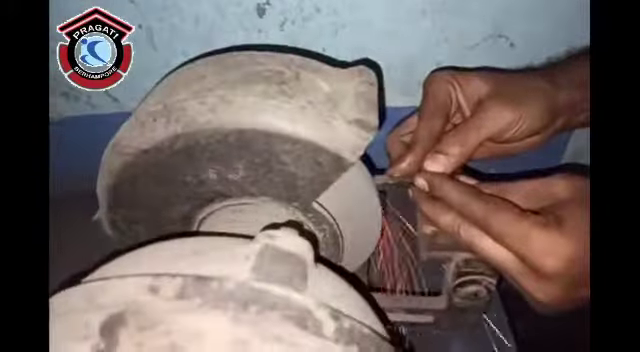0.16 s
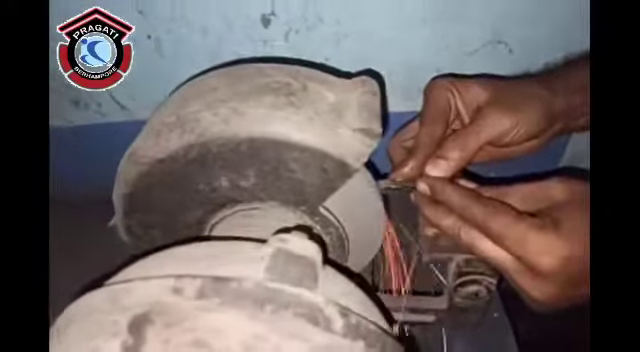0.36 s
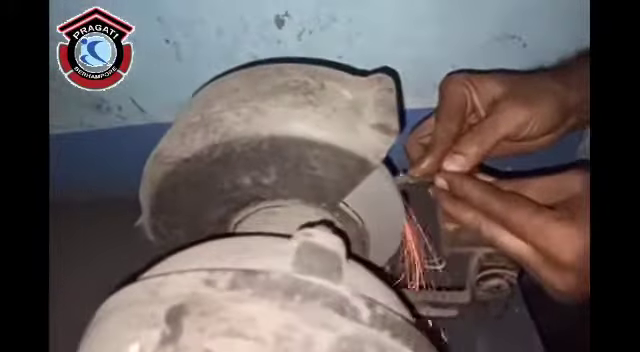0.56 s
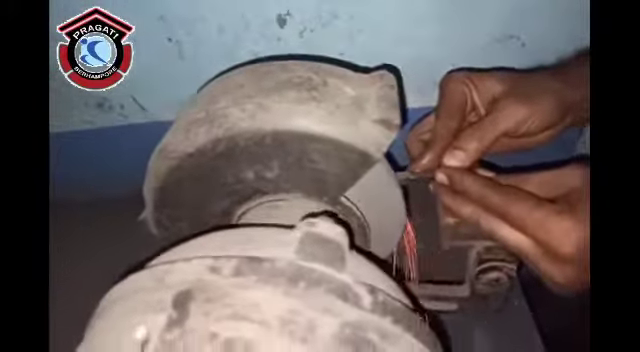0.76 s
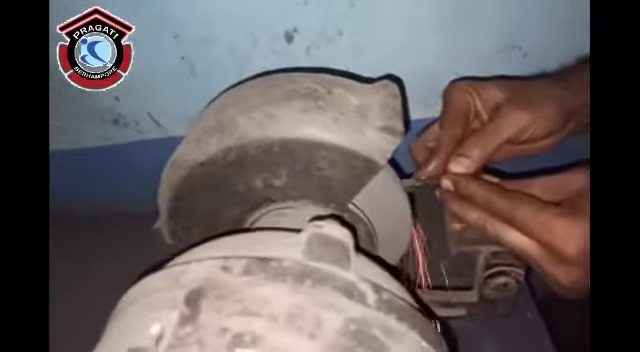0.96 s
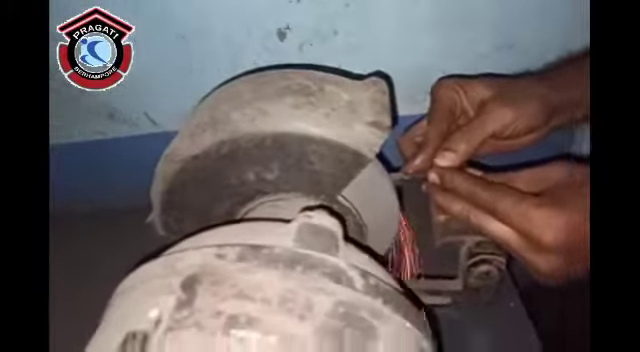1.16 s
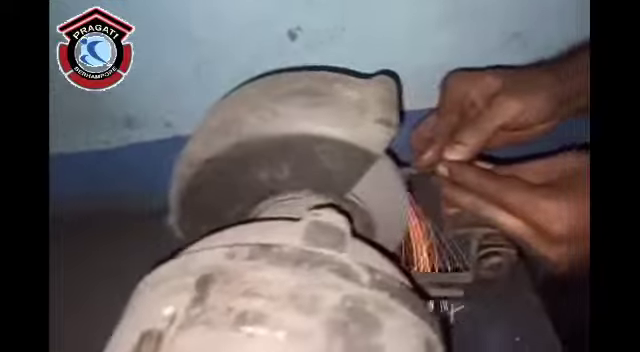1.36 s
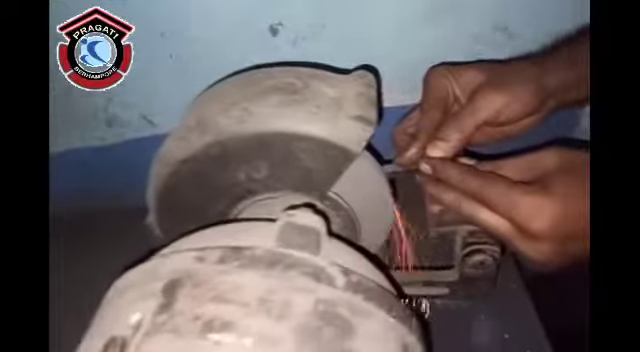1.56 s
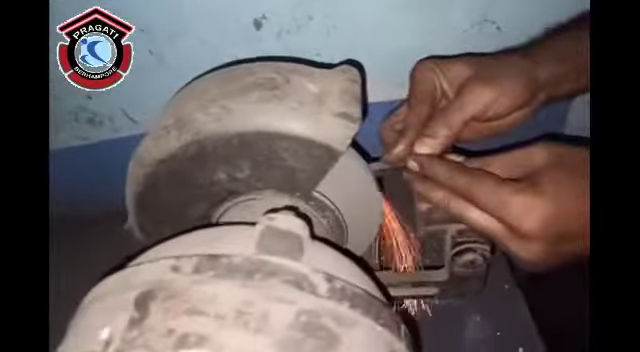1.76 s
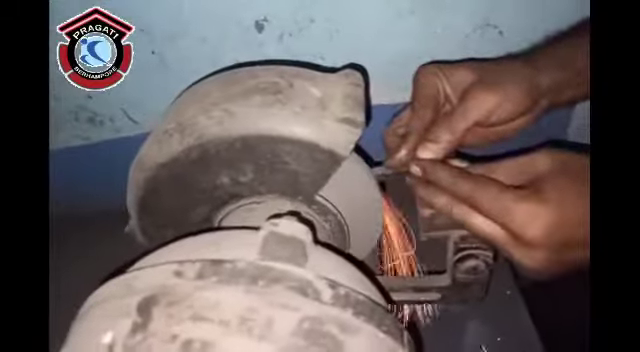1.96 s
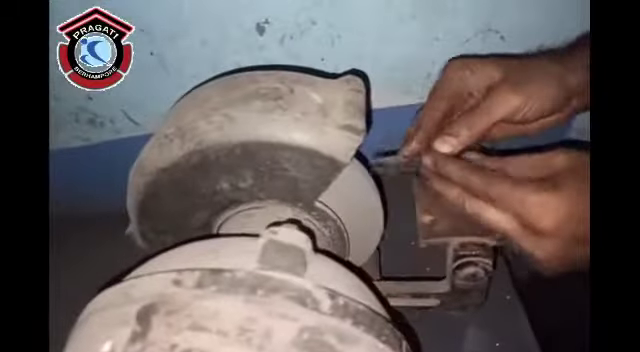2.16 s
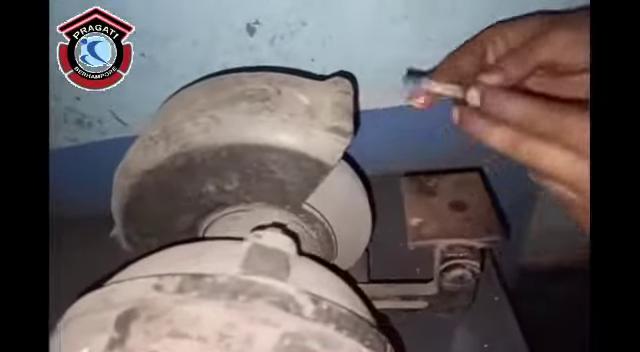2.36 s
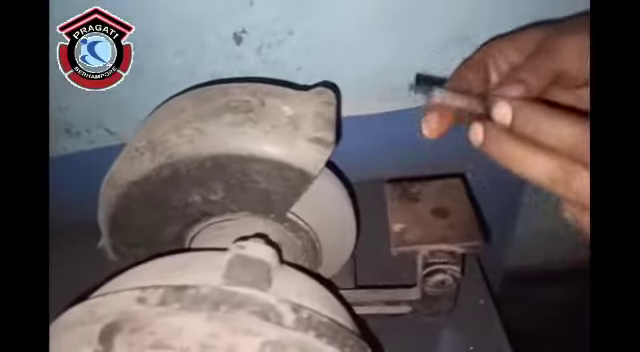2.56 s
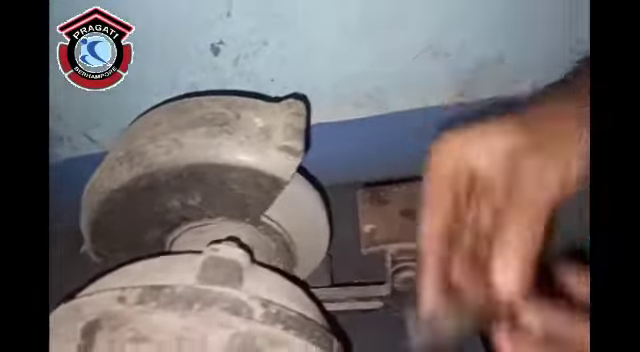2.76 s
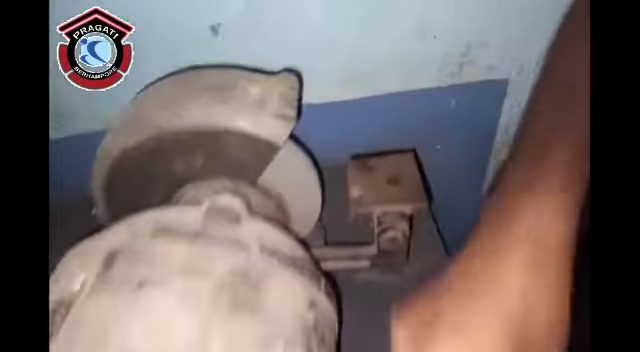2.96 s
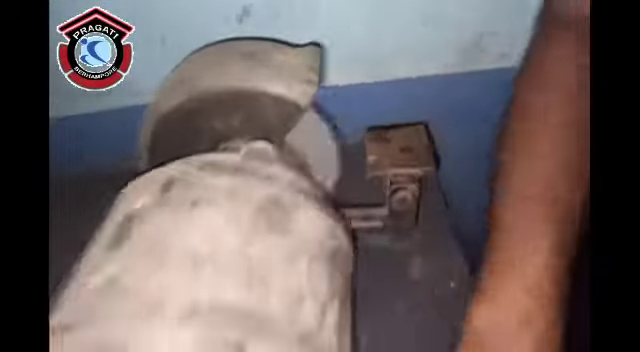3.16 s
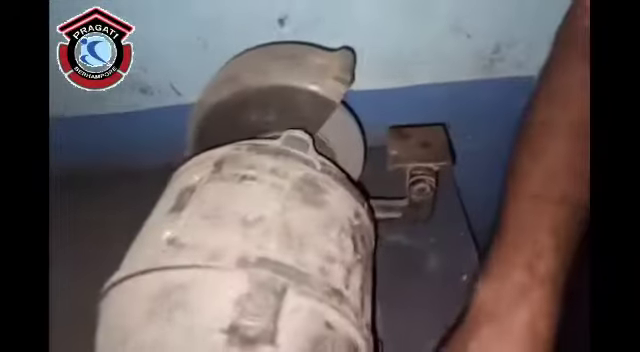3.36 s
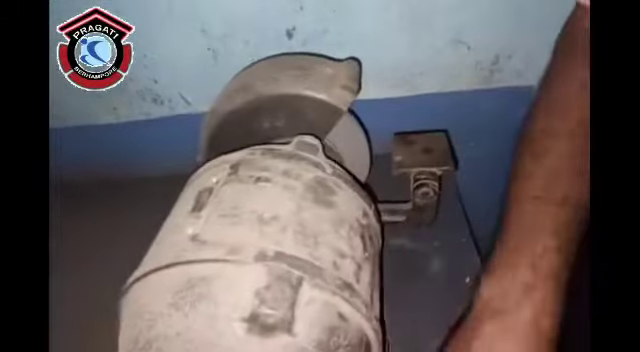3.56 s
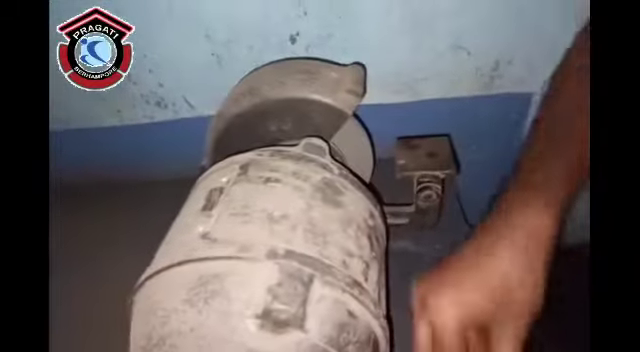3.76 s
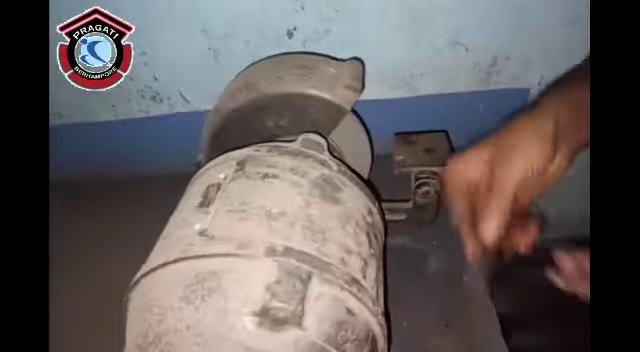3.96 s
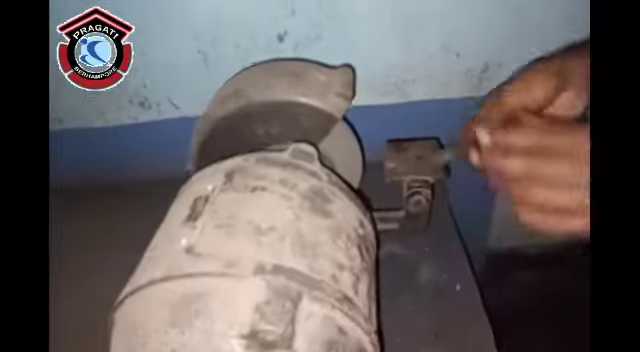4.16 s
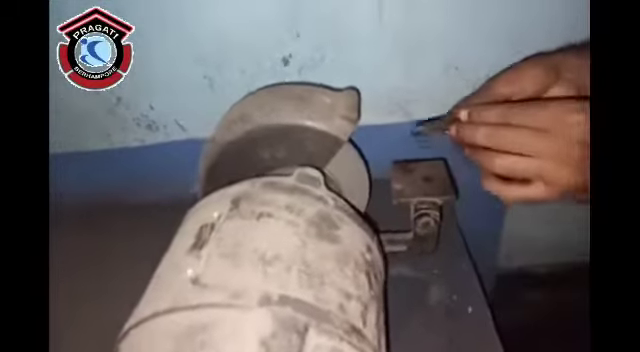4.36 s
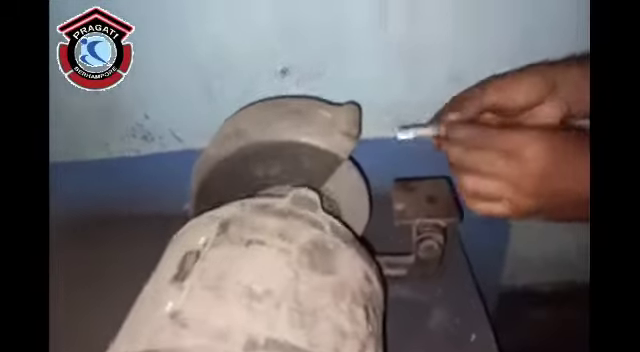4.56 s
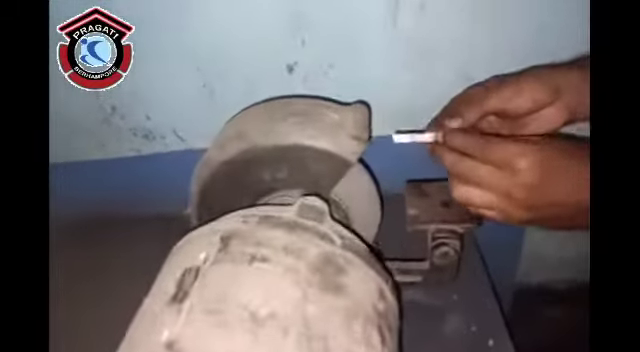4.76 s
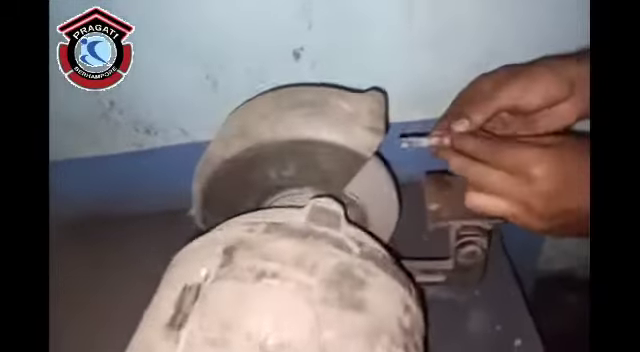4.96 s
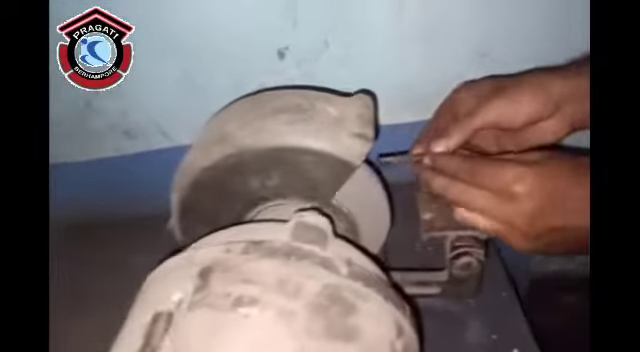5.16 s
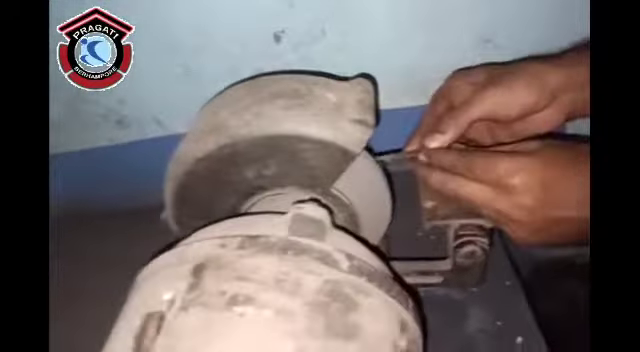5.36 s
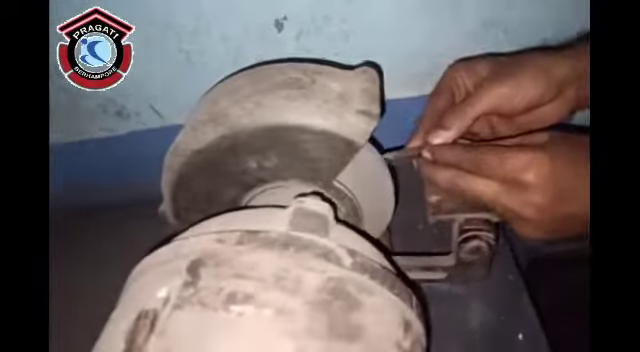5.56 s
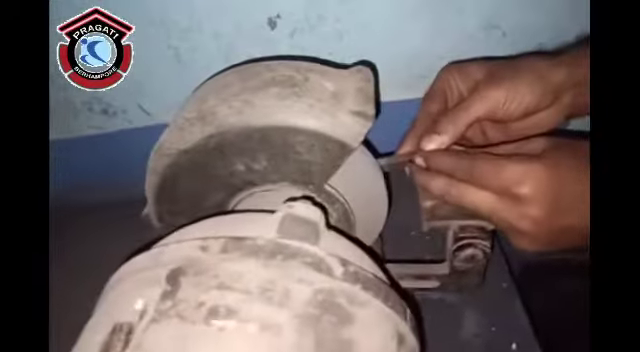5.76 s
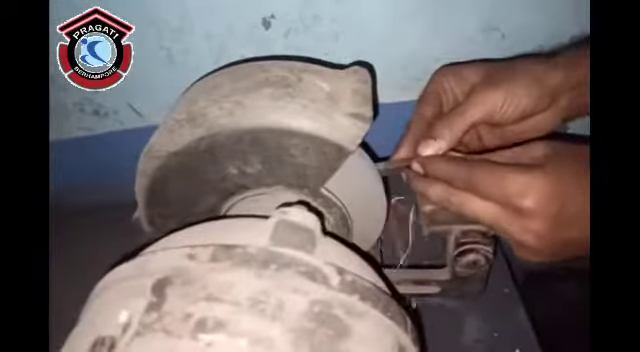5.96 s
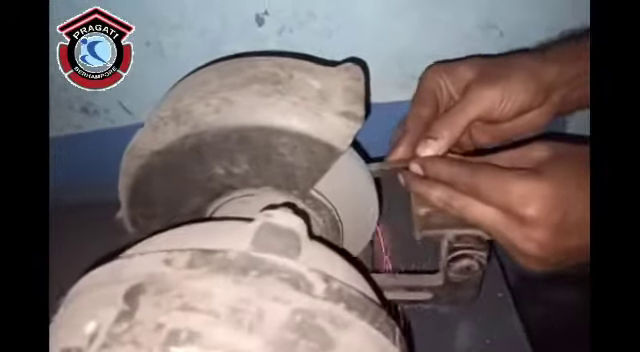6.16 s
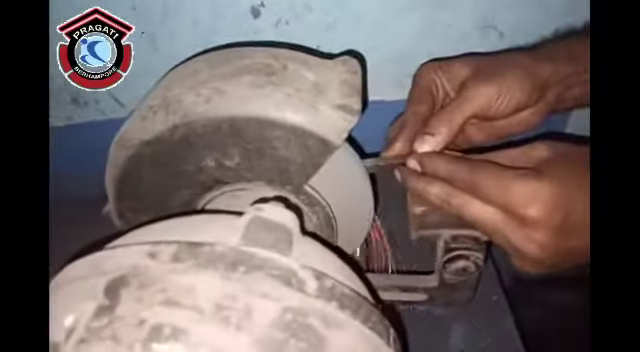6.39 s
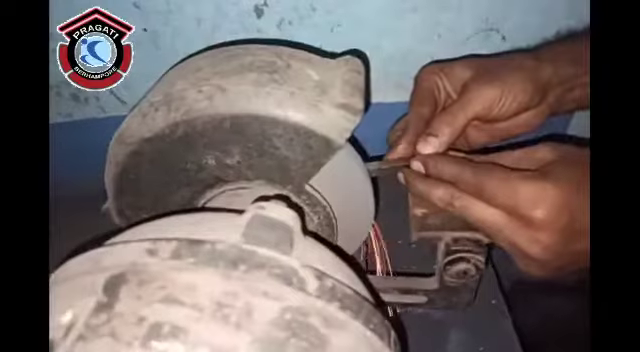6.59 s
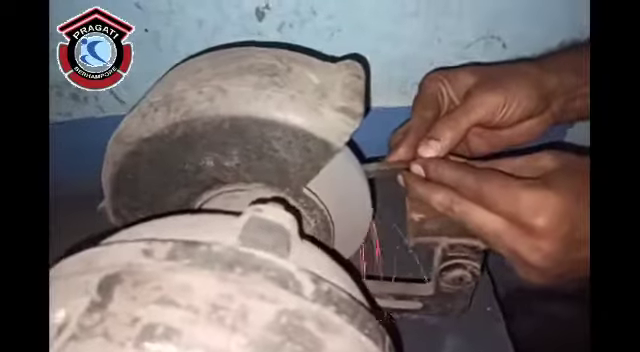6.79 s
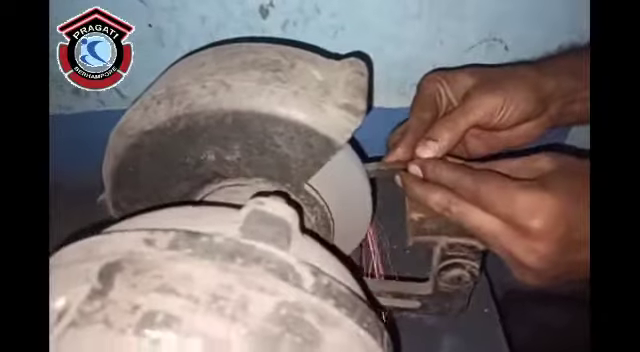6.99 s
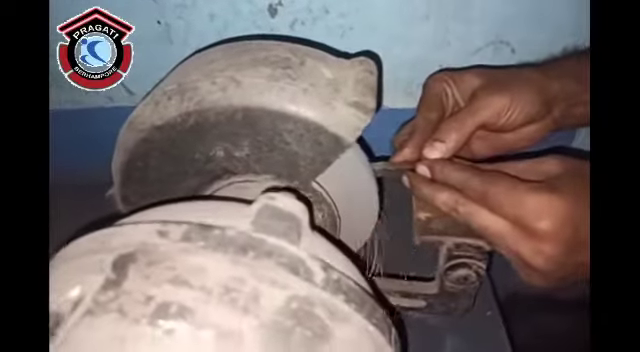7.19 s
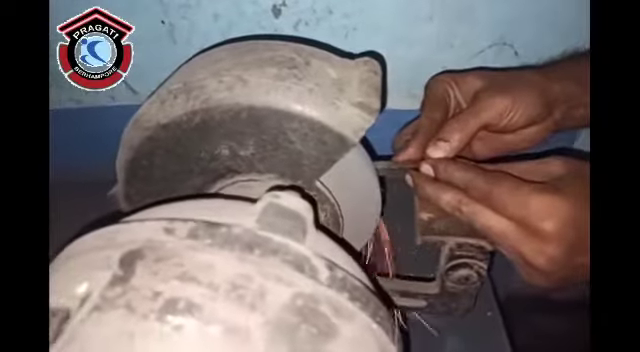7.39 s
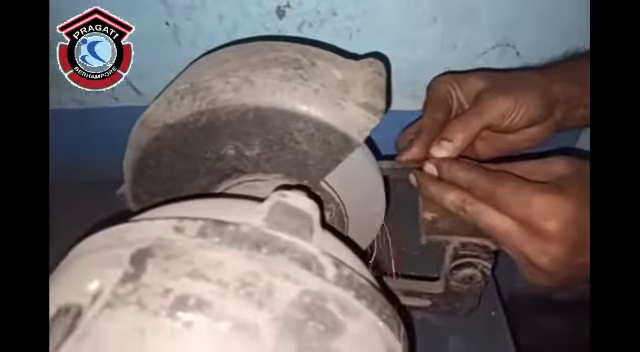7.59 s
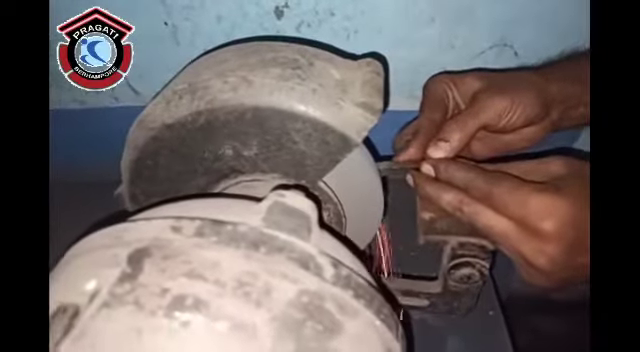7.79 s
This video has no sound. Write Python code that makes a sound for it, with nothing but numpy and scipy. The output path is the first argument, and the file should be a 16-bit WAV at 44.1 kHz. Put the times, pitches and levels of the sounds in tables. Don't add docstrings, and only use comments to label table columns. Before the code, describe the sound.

Bright, ringing metal grinding stops after two seconds, leaving motor hum with loose guard knocks and buzz, before a second grinding pass begins and continues.

```python
import sys
import numpy as np
from scipy import signal
from scipy.fft import rfft, irfft, dct, next_fast_len
from scipy.io import wavfile
from scipy.ndimage import uniform_filter1d, map_coordinates

SR = 44100
rng = np.random.default_rng(int(sys.argv[2]) if len(sys.argv) > 2 else 0)


def linear_from_db(decibels):
    return 10 ** (np.asarray(decibels, float) / 20)


def materialize(psi):
    bounded = np.clip(np.atleast_2d(psi).T, -1, 1)
    quanta = np.round(bounded * 32767).astype(np.int16)
    wavfile.write(sys.argv[1], SR, quanta)


N = 345303
SIZE = next_fast_len(N + SR // 4)
HZ = np.maximum(np.arange(SIZE // 2 + 1) * SR / SIZE, 1)
GAP_HZ, CUTOFF_HZ = (8530, 11480), 15900
# start_s, peak_db, low_panels_db (above the peak)
KNOCKS = [(2.2618, -27, -2), (2.2804, -19, 2), (2.4385, -17.5, 5.5), (2.5177, -27, -11), (2.5805, -23, 4),
          (2.6224, -23, 3), (2.6858, -26.5, 10), (2.7327, -23, 5), (2.7836, -24, 8), (2.8384, -29, 12.5),
          (2.9013, -26, 2), (3.0315, -26.5, 7), (3.0565, -30, 1), (3.2051, -26, 12), (3.2897, -22, 5),
          (3.4171, -23, 3), (3.5428, -24, 0), (3.6486, -30, 9), (3.8834, -28, 6), (4.1424, -32, 13),
          (4.2882, -31.5, 5), (4.361, -25.5, 5), (4.4004, -26.5, 8), (4.595, -31, 0), (4.6506, -26.5, 2),
          (4.816, -28, 10), (4.8924, -28, 5), (4.9372, -29, 10), (5.0963, -25.5, 12.5), (5.1771, -16, 6),
          (5.1964, -23.5, 3), (5.2174, -25.5, 3), (5.2924, -33, 1), (5.3398, -24.5, 9), (5.3594, -29.5, 5),
          (5.5942, -20.5, 6), (5.693, -21.5, 8.5)]


def grinding(turns, pressed):
    # start_s, scrape_db (pressure), bend_db (slack of the grip, above the scrape)
    touches = [
        [(0.0, -16.5, -15), (0.02, -21, -2.5), (0.2, -21, 0.5), (0.33, -20.5, -3.5), (0.51, -20.5, -1.5),
         (0.62, -18.5, -7), (1.3, -19.5, -5), (1.45, -20, -1.5), (2.06, -19.5, -3.5), (2.15, -23.5, -7.5),
         (2.16, -30.5, -1.5)],
        [(5.9, -22.5, -9.5), (5.91, -21, -14), (5.92, -25, -4.5), (5.96, -21.5, -4), (6.05, -19.5, -2),
         (6.162, -19.5, -4.5), (6.6, -19.5, -4), (7.1, -19.5, -4.5), (7.684, -19.5, -2.5), (7.742, -17.5, -8),
         (7.83, -20, -3)],
    ]
    # start_s, peak_db
    graze_events = [
        (5.872, -13),
        (5.889, -12.5),
        (5.912, -15),
    ]
    # centre_s, length_s, level_db (under the scrape)
    flares = [(.15, 0.055, -21.5), (.37, 0.058, -18), (.65, .05, -26), (.87, .08, -27), (1.06, 0.11, -16),
              (1.32, 0.1, -17), (1.56, .12, -22), (1.74, 0.14, -21.5), (5.9, 0.083, -24.5),
              (6.395, 0.051, -22.5), (6.57, 0.05, -24), (7.19, 0.088, -26), (7.45, 0.065, -26)]
    # turns, swing_db
    wear = [
        (0, 2.4),
        (105, 1.4),
        (290, .5),
    ]
    # time_s, level_db
    angle = [(0, -12.5), (.8, -11), (1.3, -8), (2.15, -7.5), (5.9, -11), (6.5, -9.5), (7.2, -9), (7.83, -9)]
    # time_s, ridge_hz, ridge_db (against the fixed peaks)
    grip = [(0, 4020, -4.5), (.55, 4020, -6), (.8, 4095, -4.5), (1.9, 4100, -6), (2.15, 4110, -2),
            (5.92, 4130, 3), (6.2, 4096, 2), (6.55, 4050, 2.5), (7.1, 4070, 1.5), (7.5, 4085, -2),
            (7.83, 4060, -2.5)]
    # centre_hz, width_hz, level_db
    bar = [(1900, 270, -18), (2640, 50, -24), (3320, 120, -9.5), (3700, 200, -12), (4250, 200, -6.5),
           (4690, 77, -12), (5400, 88, -26.5), (5860, 45, -6.5), (6250, 140, -8), (6810, 250, -9),
           (7330, 240, 0), (7530, 94, 1), (7910, 130, -2), (8430, 140, 0.5), (8600, 580, 3)]
    # centre_hz, width_hz, level_db
    bending = [(3954, 31, 1.5), (4016, 170, 0.5), (4100, 66, -2)]
    # centre_hz, width_hz, level_db
    top_modes = [(11790, 450, -7), (12960, 90, 0), (13300, 90, 0), (14200, 900, -12), (15000, 500, -13)]
    # centre_hz, width_hz, level_db
    rest = [(1084, 48, -6.5), (1379, 34, -7.5), (638, 100, -14)]
    # freq_hz, level_db_per_hz
    shake_spectrum = [(15, -42), (25, -32), (92, -2), (199, -3), (221, -4), (269, -2), (293, -8), (330, -9),
                      (430, -42), (730, -120)]

    scrape_db, bend_db = in_time(touches[0] + touches[1])
    swing_db = np.interp(turns, *np.transpose(wear))
    angle_rad = 2 * np.pi * turns
    runout = np.cos(angle_rad + 1.6) + 0.25 * np.cos(2 * angle_rad + 1.9)
    contact_db = swing_db * runout * (1 + 0.13 * drift(6.1))
    contact = linear_from_db(contact_db + 0.34 * drift(32) + 1.42 * drift(150))
    rocking = linear_from_db(swing_db * (1.1 * np.cos(angle_rad - .6) + .6 * np.cos(2 * angle_rad + .3)))

    tearing = contact * grit(2.7)
    ring = modes(bar[:10] + bar[12:], -18.5) * band(1000, 12600)
    middle = band(5660, 7090, order=10)
    scrape = body(tearing, ring * (1 - middle))
    scrape = scrape + linear_from_db(in_time(angle)[0] + 1.2 * drift(1.2)) * body(tearing, ring * middle)
    freed = body(tearing[::-1], modes(bar[10:12], -46))
    scrape = scrape + linear_from_db(-8.5 + 0.54 * (bend_db + 5.0)) * freed
    scrape = flexed(scrape, share=.004, rate_hz=1.6)

    bend_force = contact * rocking * linear_from_db(0.61 * drift(30)) * grit(4.7)
    bend = body(bend_force, modes(bending, -50.5, steep=3.4))
    ridge_hz, ridge_db = in_time(grip)
    ridge = sliding(contact * rocking * grit(3.7), ridge_hz + 25.97 * drift(6.99), width_hz=43)
    bend = (bend + linear_from_db(ridge_db) * ridge) / np.sqrt(1 + linear_from_db(2 * ridge_db))

    top = body(contact * grit(0.92), modes(top_modes, -21) * band(13000, 18000, order=8))
    top = flexed(top, share=.006, rate_hz=2.2)
    settle_s = .15
    r = np.exp(-1 / (settle_s * SR))
    settled = signal.lfilter([1 - r], [1, -r], pressed, zi=[pressed[0]])[0]
    lift = 1 + linear_from_db(8) * swells(flares, stretch=0.85)
    top_gain = linear_from_db(-12.5) * (0.27 + 0.9 * settled ** 2) * lift

    rest_noise = body(contact * grit(0.58), modes(rest, -25.5) * band(450, 2200))
    bumps = wheel_bumps(turns) + linear_from_db(np.where(turns < 200, -5.0, -0.5)) * rest_noise
    bump_db = -27 + 0.39 * (scrape_db + 19)
    shake = body(grit(0), linear_from_db(at_hz(shake_spectrum)) * band(20, 300))

    grazes = bursts(*np.transpose(graze_events), t60_s=0.02, size=90)
    level = pressed * linear_from_db(scrape_db + 5.0) + grazes
    sound = level * (scrape + pressed * linear_from_db(bend_db - 2.0) * bend + top_gain * top)
    sound = sound + linear_from_db(-15) * grazes * top
    sound = sound + pressed * (linear_from_db(bump_db - 1.0) * bumps + linear_from_db(-39.5) * shake)
    spit = body(grit(2.5), band(9000, 9900, order=26))
    spit = level * (swells(flares, stretch=.4) + linear_from_db(-48)) * spit
    return starved(sound) + spit


def wheel_bumps(turns):
    orders = [(6, -23), (11, -9.5), (13, -3.5), (14, -5.5), (15, -25.5), (16, -14.5), (19, -22), (20, -6.5),
              (21, 0.5), (22, 3.5), (23, -7.5), (24, -13), (25, -15.5), (26, -25.5), (28, -11), (29, -7.5),
              (30, -25.5), (31, -42.5)]
    blur = np.interp(turns, [110, 290], [.008, .4])
    lines = 0
    for k, db in orders:
        gain = linear_from_db(db + (1.5 + 5.2 * blur) * drift(1.66))
        cycles = k * turns + rng.random() + blur * drift(3.9)
        lines = lines + gain * np.sin(2 * np.pi * cycles)
    return rms_one(lines) * np.array([[1.4], [0]])


def motor(turns, pressed, swing_db):
    # centre_hz, width_hz, level_db
    casing = [(311, 21, -18.5), (351.7, 19, -15), (388.9, 7.8, -0.5), (452.7, 22.3, -3.5),
              (482.2, 8.4, -5.5), (560, 17, -2.5), (638, 7.7, -15), (681.2, 20.3, -8)]
    # centre_hz, width_hz, level_db
    cover_modes = [(925.6, 19.4, 0), (949.4, 19, 2.5), (1019, 39, -1), (1116, 52, -6.5), (1208, 20.5, -2)]
    unbalance = [(1, -65.5), (2, -46.5), (3, -43), (4, -47)]
    # freq_hz, level_db_per_hz
    rumble_spectrum = [(15, -59.5), (25, -34), (70, -33), (91, -22.5), (118, -21.5), (141, -17),
                       (173, -20.5), (199, -8.5), (330, -11.5), (430, -33), (730, -120)]
    # time_s, level_db
    hum = [
        (4.2, -1.5),
        (5.5, -12),
        (6.0, -6),
    ]

    throb = linear_from_db(0.2 * drift(7.1) + 0.5 * np.cos(2 * np.pi * turns))
    at_s, peak_db, _ = np.transpose(KNOCKS)
    throb = throb * (1 + bursts(at_s, peak_db + 16, t60_s=0.14, size=600))
    low = body(throb * grit(3.7), modes(casing, -28.5) * band(288, 531, order=30))
    low = flexed(low, share=0.00796, rate_hz=3.85)
    upper = body(throb * grit(0.58), modes(casing, -28.5) * band(576, 930, order=14))
    cover_force = throb * linear_from_db(1.95 * drift(29)) * grit(0.84)
    cover = body(cover_force, modes(cover_modes, -18.0) * band(835, 1740, order=8))
    drone = linear_from_db(swing_db - 19.0) * low
    drone = drone + linear_from_db(-24 + swing_db) * upper + linear_from_db(-22.5 + 0.73 * swing_db) * cover

    orders = 0
    for k, db in unbalance:
        gain = linear_from_db(db + 1.5 + 1.2 * drift(3.3))
        orders = orders + gain * np.sin(2 * np.pi * (k * turns + rng.random()))
    orders = linear_from_db(in_time(hum)[0]) * orders * np.array([[1.4], [0]])
    rumble = body(grit(0), linear_from_db(at_hz(rumble_spectrum)) * band(20, 340, order=12))
    return drone + (orders + linear_from_db(-33.5 - 2.5) * rumble) * linear_from_db(-6 * pressed)


def guards(turns, pressed, swing_db):
    # centre_hz, width_hz, level_db
    guard = [(1440, 61, -8), (1753, 58, 1.5), (1887, 35, -5), (2150, 63, -9.5), (2383, 52, -13),
             (2566, 30, -12.5), (3233, 160, -14.5), (3440, 100, -13.5), (3640, 240, -16.5),
             (4270, 250, -26), (4640, 40, -11)]
    # centre_hz, width_hz, level_db
    hiss_modes = [(5740, 340, -10.5), (6350, 80, -7), (6870, 520, -7), (7480, 180, -7), (8130, 57, -10)]
    # start_s, length_s, level_db, top_db (above it)
    puffs = [
        (3.172, .06, -31, -2),
        (5.166, 0.07, -38, -24),
        (5.335, 0.041, -44, -25),
    ]
    # time_s, high_db, ring_db (above high), ring_hz, middle_ring_db
    hands = [(2.25, -33, -1.5, 3470, -5), (2.94, -35, 0.5, 3440, -1), (3.14, -35.5, -1, 3430, -14),
             (3.2, -34.5, -13, 3450, 11.5), (3.6, -37, -10, 3450, 0), (3.8, -37, -13, 3450, -11),
             (4.11, -37, -12, 3500, -1.5), (4.66, -37, -7, 3560, -4.5), (4.75, -35.5, -7, 3500, -1),
             (5.2, -34.5, -1.5, 3450, 0), (5.44, -35, -1, 3460, -4), (5.6, -37, 2.5, 3470, -11),
             (5.85, -36.5, -3, 3490, -1)]

    buzz_db, hiss_db = -28 + 0.26 * swing_db, -35.5 + 0.37 * swing_db
    high_db, ring_db, ring_hz, middle_db = in_time(hands)
    flutter = linear_from_db(1.23 * drift(21) + 0.23 * np.cos(2 * np.pi * turns))
    # low_hz, high_hz, level_db
    panels = [(1540, 1930, -0.83), (2020, 3310, -5.5 - 0.42 * swing_db), (3020, 4400, high_db + 31.1)]
    sheet = 0
    for low_hz, high_hz, db in panels:
        panel = body(flutter * grit(0.8), modes(guard, -22.0) * band(low_hz, high_hz, order=12))
        sheet = sheet + linear_from_db(db + 0.22 + 2.25 * drift(9.3)) * panel
    ring = sliding(flutter * grit(.8), ring_hz + 18 * drift(5.04), width_hz=90)
    middle = sliding(flutter * grit(0.98), 2585 + 8 * drift(4.2), width_hz=49)
    sheet = sheet + linear_from_db(high_db + ring_db + 30.5) * ring + linear_from_db(middle_db - 10.5) * middle

    hiss_response = modes(hiss_modes, -24.5) * band(4000, 12500, order=8) * (HZ < GAP_HZ[0])
    hiss = body(flutter * grit(0.98), hiss_response)
    top = body(grit(1.5), band(11350, 16500, order=8))
    t = np.arange(N) / SR
    for s, length, db, top_db in puffs:
        edge = np.minimum(t - s, s + length - t)
        shape = np.clip(edge / 0.0057, 0, 1) * linear_from_db(db - hiss_db)
        hiss = hiss * (1 + shape)
        top = top * (1 + shape * linear_from_db(top_db + 10.5))

    at_s, peak_db, low_db = np.transpose(KNOCKS)
    knock = body(grit(4.4), modes(guard, -16) * band(800, 2900, order=10))
    clang = body(grit(3.9), modes(guard[6:], -17) * band(2900, 4800, order=12))
    knocks = bursts(at_s, peak_db + low_db - 4.5, t60_s=0.14, size=500) * knock
    knocks = knocks + bursts(at_s, peak_db - 0.5, t60_s=0.11, size=500) * clang
    knocks = knocks + bursts(at_s, peak_db - 18.5, t60_s=0.11, size=500) * hiss
    return (linear_from_db(buzz_db) * sheet + knocks + linear_from_db(hiss_db) * hiss + linear_from_db(-49.5) * top) * linear_from_db(-9 * pressed)


def grit(lumpy_db):
    return rng.standard_normal((2, N)) * linear_from_db(lumpy_db * rng.standard_normal(N))


def body(force, response):
    return rms_one(irfft(rfft(force, SIZE) * response, SIZE)[..., :N])


def modes(table, floor_db, steep=1.214):
    f = HZ[::8]
    power = linear_from_db(floor_db) ** 2
    for hz, width_hz, db in table:
        detuning = (f - hz ** 2 / f) / width_hz
        power = power + linear_from_db(db) ** 2 / (1 + detuning ** 2) ** steep
    return fine(np.sqrt(power))


def band(low_hz, high_hz, order=4):
    f = HZ[::8]
    return fine(1 / np.sqrt((1 + (low_hz / f) ** (2 * order)) * (1 + (f / high_hz) ** (2 * order))))


def fine(coarse):
    return np.interp(HZ, HZ[::8], coarse)


def sliding(force, hz, width_hz):
    r = np.exp(-np.pi * width_hz / SR)
    poles = [1, -2 * r, r * r]
    in_phase = signal.lfilter([1], poles, force)
    quadrature = signal.lfilter([1], poles, force * rng.choice([-1, 1], N))
    phase = 2 * np.pi * np.cumsum(hz) / SR
    return rms_one(np.cos(phase) * in_phase + np.sin(phase) * quadrature)


def flexed(x, share, rate_hz):
    lag = share * SR / (2 * np.pi * rate_hz) * drift(rate_hz)
    at = np.clip(np.arange(N) + lag, 0, N - 1)
    return np.array([map_coordinates(side, [at], order=3) for side in x])


def bursts(times_s, peaks_db, t60_s, size):
    kicks = np.full(N, 1e-18)
    kicks[(np.array(times_s) * SR).astype(int)] = linear_from_db(np.array(peaks_db))
    return signal.lfilter([1], [1, -linear_from_db(-60 / (t60_s * SR))], uniform_filter1d(kicks, size=size))


def swells(rows, stretch):
    t = np.arange(0, N, 32) / SR
    humps = sum(linear_from_db(db) * np.exp(-((t - s) / (stretch * length)) ** 2) for s, length, db in rows)
    return np.interp(np.arange(N) / SR, t, humps)


def drift(rate_hz):
    r = np.exp(-40 * np.pi * rate_hz / SR)
    slow = signal.lfilter([1], [1, -2 * r, r * r], rng.standard_normal(N // 20 + 4002))[4000:]
    return np.interp(np.arange(N) / 20, np.arange(len(slow)), rms_one(slow))


def rms_one(x):
    return x / np.sqrt(np.mean(x ** 2) + 1e-20)


def in_time(rows):
    s, *columns = np.transpose(rows)
    return [np.interp(np.arange(N) / SR, s, c) for c in columns]


def at_hz(points):
    hz, values = np.transpose(points)
    return np.interp(np.log(HZ), np.log(hz), values)


def ports(pair, table):
    # delay_s, twist_rad
    scatter = [
        (.0011, 0.38),
        (.0023, 0.41),
        (.0041, 0.56),
    ]
    alike, balance_db, lead = [at_hz(t) for t in table]
    alike = np.clip(alike, 0, .99)
    twist = sum(rad * np.sin(2 * np.pi * HZ * s) for s, rad in scatter)
    lead = lead + np.clip(HZ / 6000 - .5, 0, 1) * twist
    direct, diffuse = rfft(pair, SIZE)
    sign = np.array([[1], [-1]])
    both = np.sqrt(1 + alike) * direct + sign * np.sqrt(1 - alike) * diffuse
    both = both * linear_from_db(sign * balance_db / 2) * np.exp(.5j * sign * lead)
    return irfft(both, SIZE)[:, :N] / np.sqrt(2)


def starved(x, step_db=-10):
    # centre_hz, width_hz, level_db
    dips = [(2790, 100, -1), (4970, 130, -3.5), (5720, 190, -1.5)]
    shoulder = linear_from_db(step_db - 11 * (HZ - GAP_HZ[0]) / 1000)
    gain = np.where((HZ > GAP_HZ[0]) & (HZ < GAP_HZ[1]), shoulder, 1) * (HZ < CUTOFF_HZ)
    gain = gain * linear_from_db(sum(db * np.exp(-((HZ - hz) / width) ** 2) for hz, width, db in dips))
    return irfft(rfft(x, SIZE) * gain, SIZE)[:, :N]


def masked(x, slope_db=10.0, wobble_db=3.5):
    # freq_hz, level_db
    allowed = [(300, -40), (1500, -24), (2400, -16), (2900, -9), (3500, -9), (4300, -19), (4800, -9.5),
               (5100, -5.5), (5600, -5), (6000, -13), (8300, -14), (8700, -30), (9200, -13.5),
               (10000, -5.5), (11400, 5), (11800, -2.5), (15000, -0.5), (15300, 1.5), (15500, 6),
               (15900, 10)]
    hop, lead = 1024, 1024 - 267
    count = N // hop + 3
    padded = np.pad(x, ((0, 0), (lead, (count + 1) * hop - x.shape[1] - lead)))
    window = np.sin(np.pi * (np.arange(2 * hop) + .5) / (2 * hop))
    frames = np.lib.stride_tricks.sliding_window_view(padded, 2 * hop, axis=1)[:, ::hop] * window
    a, b, c, d = np.split(frames, 4, axis=2)
    folded = np.concatenate([-c[..., ::-1] - d, a - b[..., ::-1]], axis=2)
    lines = dct(folded, type=4, norm="ortho")

    single = (lines ** 2).sum(axis=0) + 1e-16
    power = uniform_filter1d(single, size=3, axis=0)
    patch_db = 10 * np.log10(uniform_filter1d(power, size=4, axis=1) + 1e-16)
    wide_db = 10 * np.log10(uniform_filter1d(power, size=32, axis=1) + 1e-16)
    khz = (np.arange(hop) + .5) * SR / (2000 * hop)
    masker_db = np.maximum.accumulate(wide_db + slope_db * khz, axis=1) - slope_db * khz
    bands = np.cumsum(1 / np.clip(1.6 * khz, 4, 32)).astype(int)
    chance = uniform_filter1d(rng.standard_normal(power.shape), size=2, axis=0)
    spare_db = wobble_db * chance[:, bands] * 1.3
    allowed_db = np.interp(khz * 1000, *np.transpose(allowed))

    rounded_up = (10 * np.log10(single) > patch_db - 11) | (khz < 1.6)
    audible = (patch_db > -46) | (khz < 8.6) | (khz > 11.43)
    kept = rounded_up & audible & (patch_db > masker_db + allowed_db + spare_db)
    u, v = np.split(dct(lines * kept, type=4, norm="ortho"), 2, axis=2)
    unfolded = np.concatenate([v, -v[..., ::-1], -u[..., ::-1], -u], axis=2) * window
    first, second = np.split(unfolded, 2, axis=2)
    return (first[:, 1:] + second[:, :-1]).reshape(2, -1)[:, lead:][:, :N]


def scene():
    # time_s, speed_turns_per_s
    wheel = [
        (0, 49.4),
        (2.15, 49.4),
        (2.4, 49.85),
        (5.85, 49.85),
        (6.1, 49.61),
        (7.83, 49.61),
    ]
    # time_s, share (0-1)
    contact = [
        (0, 0.88),
        (2.15, 1),
        (2.19, 0.04),
        (5.89, 0.01),
        (5.91, 0.97),
        (7.83, 0.84),
    ]
    # time_s, level_db
    drone = [(0.0, -28.5), (1.63, -28), (1.68, -26), (1.98, -30.5), (2.2, -20.5), (2.53, -20), (2.79, -19),
             (2.9, -20.5), (2.92, -18), (3.23, -21), (4.82, -22), (4.86, -17.5), (5.04, -21.5),
             (5.34, -19.5), (5.41, -21), (5.87, -18.5), (5.95, -25), (7.83, -29)]
    # freq_hz, then likeness (0-1), left_right_db, left_lead_rad
    idle_ports = [
        [(60, 0.93), (400, 0.74), (1200, 0.73), (2000, 0.48), (3000, 0.1), (5000, 0.082), (9000, 0.16)],
        [(60, 3), (200, -1.5), (450, 1.5), (900, 0), (1400, 3.5), (2300, 3.5), (3000, 0.5), (4500, -1), (7200, -1.5), (8300, 5), (12000, 1.5)],
        [(60, -0.53), (1200, -0.49), (2000, -0.8), (2400, -0.79), (9000, -1.9)],
    ]
    first_ports = [
        [(100, 0.25), (600, 0.21), (1050, 0.65), (2000, 0.19), (3600, 0.21), (4000, 0.77), (4400, 0.27), (7500, 0.25), (8400, 0.6), (12000, 0.38)],
        [(60, 13.5), (300, 6.5), (700, -16), (1100, -5.5), (5500, 0), (6000, -9), (6800, -7.5), (7400, -5), (7900, -8.5), (8400, 5), (12000, 1)],
        [(100, -0.66), (700, -0.83), (1100, -0.24), (4000, -0.89), (5500, -0.81), (7400, .9), (8000, -0.11), (8400, -1.5), (12000, -2.3)],
    ]
    second_ports = [
        [(100, 0.25), (600, 0.3), (1050, 0.75), (2000, 0.35), (3600, 0.25), (4000, 0.76), (4500, 0.45), (6300, 0.48), (7500, 0.98), (8400, 0.89), (11900, 0.6), (13000, .2)],
        [(60, 15.5), (300, 10.5), (700, -14), (1100, -5), (1800, -6.5), (4000, -3), (5500, -4.5), (6300, -8), (7400, -5), (7900, 3.5), (8400, 5.5), (12000, 2.5)],
        [(100, 0.1), (700, -1.25), (1100, -1.84), (4000, -1.5), (6300, -1.1), (6900, 2.4), (7400, 1.5), (7900, 1.7), (8400, 1.5), (12000, 0.5)],
    ]

    turns = np.cumsum(in_time(wheel)[0]) / SR
    pressed = in_time(contact)[0]
    swing_db = in_time(drone)[0] + 20
    ground = grinding(turns, pressed)
    machine = motor(turns, pressed, swing_db) + guards(turns, pressed, swing_db)
    machine = starved(machine, step_db=-45)
    first = np.arange(N) < 4 * SR
    touches = ports(ground * first, first_ports) + ports(ground * ~first, second_ports)
    return ports(machine, idle_ports) + touches


def top_cut(x):
    return signal.sosfilt(signal.butter(12, 15900, fs=SR, output="sos"), x)


def record(dry):
    soft = .9 * np.tanh(dry / .9)
    delayed = np.pad(soft, ((0, 0), (1024, 0)))[:, :N + 1024]
    mix = masked(delayed)
    return top_cut(mix)


dry = scene()
out = record(dry)
materialize(out)
```